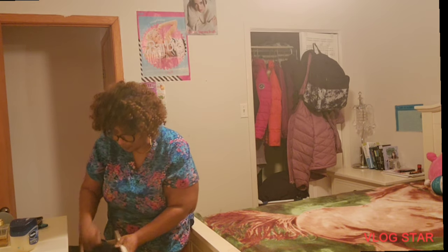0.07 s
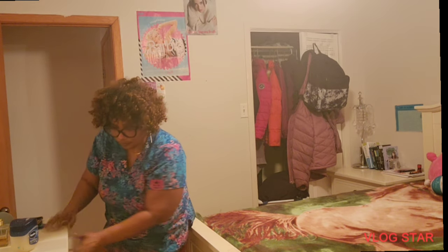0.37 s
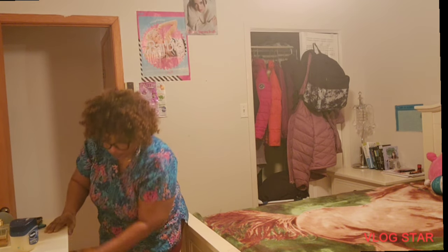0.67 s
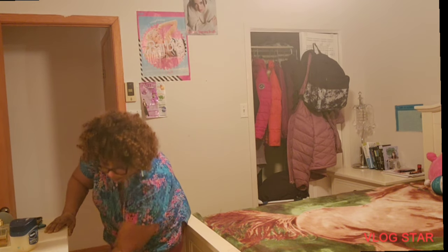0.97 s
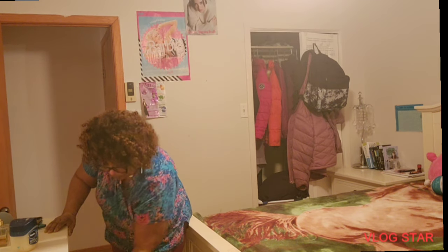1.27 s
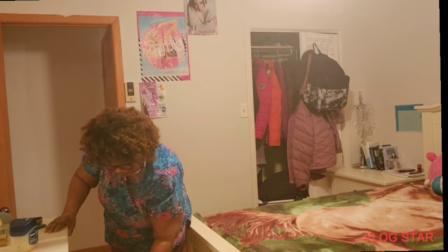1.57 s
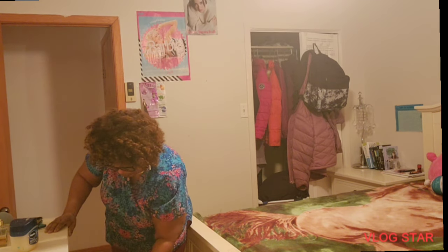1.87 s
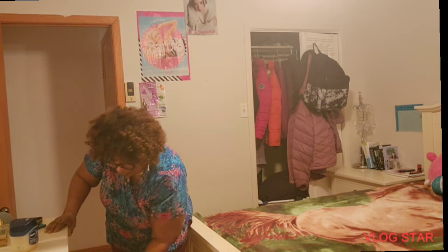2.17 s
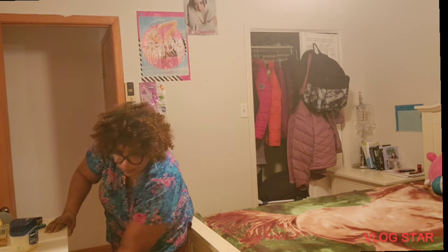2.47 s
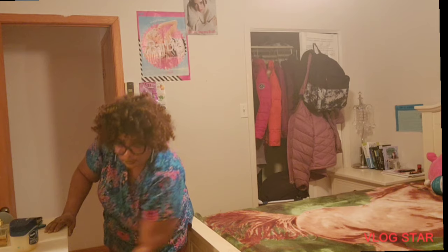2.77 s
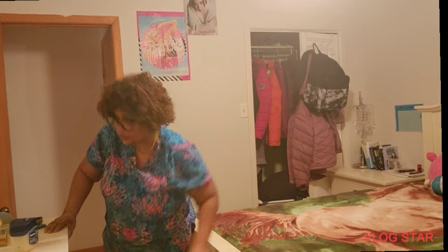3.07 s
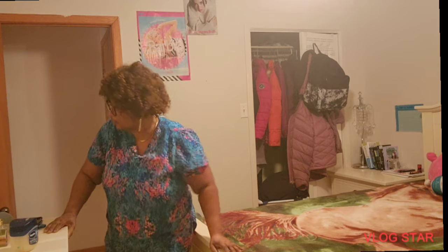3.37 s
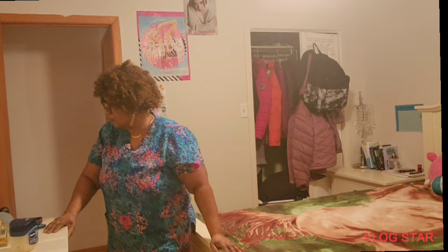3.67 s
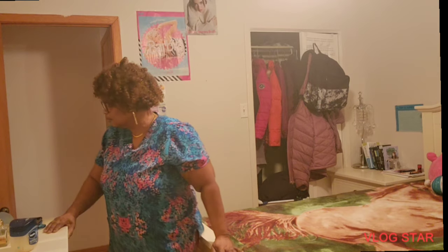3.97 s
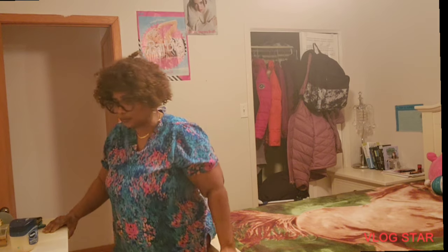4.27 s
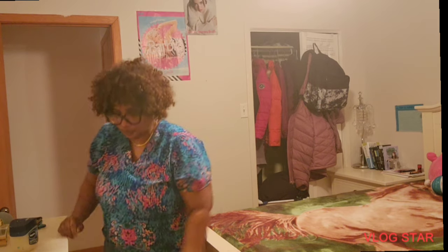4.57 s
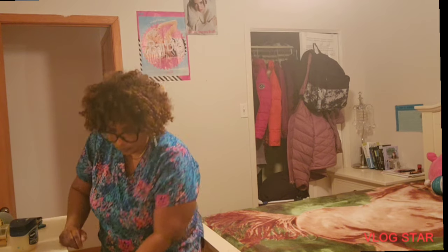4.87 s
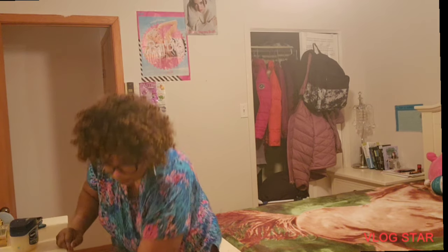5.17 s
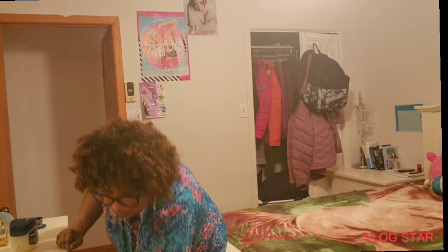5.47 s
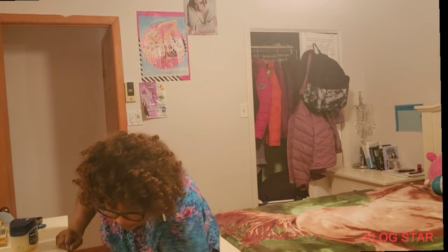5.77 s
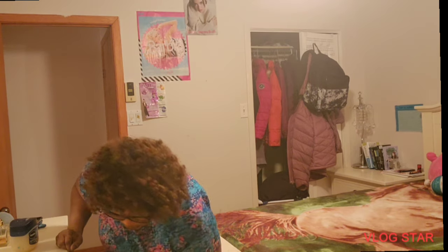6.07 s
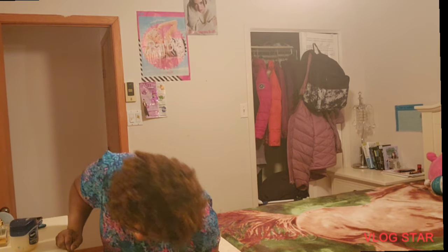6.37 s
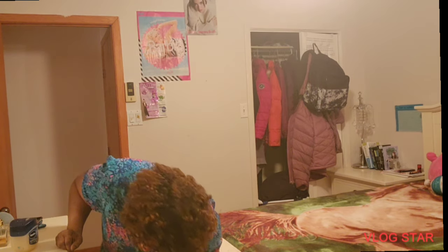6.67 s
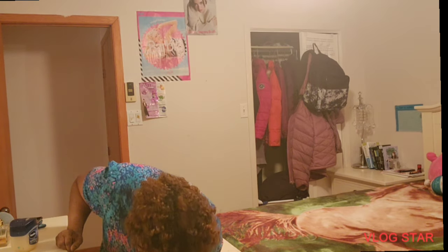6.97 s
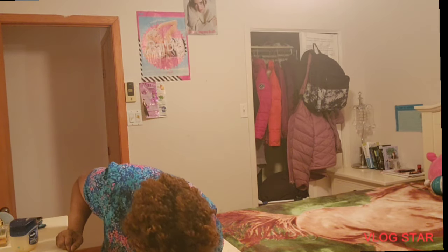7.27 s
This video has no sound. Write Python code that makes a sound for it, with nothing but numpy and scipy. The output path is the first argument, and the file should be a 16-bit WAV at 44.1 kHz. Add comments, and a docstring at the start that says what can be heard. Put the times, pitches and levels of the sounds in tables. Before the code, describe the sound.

In a small bedroom, wooden dresser drawers rumble on their runners and bang against their stops. The first bang is sharp and loudest, slightly overloading a microphone a couple of metres away, and more hollow knocks follow quickly. A quieter stretch brings soft cloth swishes, low shifts of weight on floorboards and a couple of taps on wood. Then another drawer slides and bumps closed with a few duller thuds.

```python
"""Wooden drawers rumble on their runners and bang against their stops as someone searches a dresser.
Stick-slip friction drives each slide; each impact excites free vibration, so that the thin panels clack,
the hollow carcass rings and the whole dresser booms with the floor. In between, cloth slides, a hand
taps the furniture and feet shift on the boards. The small bedroom reverberates briefly, and the
hardest bangs overload a microphone a couple of metres away."""
import sys
import numpy as np
from scipy import signal
from scipy.fft import rfft, irfft
from scipy.io import wavfile
from scipy.ndimage import uniform_filter1d

SR = 44100
rng = np.random.default_rng(int(sys.argv[2]) if len(sys.argv) > 2 else 0)


def wav_out(sig):
    """Save sig, one row per channel (or a flat mono array), as 16-bit PCM at SR to the path in sys.argv[1]."""
    wavfile.write(sys.argv[1], SR, np.round(np.clip(np.atleast_2d(sig).T, -1, 1) * 32767).astype(np.int16))


N = 331632
TIME_S = np.arange(N) / SR
RING_S = np.arange(SR) / SR  # the second that one blow may last
BINS_HZ = np.fft.rfftfreq(4096, 1 / SR)

# drawer slides: start_s, length_s, swell_db, shudder_db, rumble_db, scrape_db
DRAWER_RUNS = [(0, 0.047, -10.5, -57.5, -33, -45.5), (.12, 0.31, 6, -41.5, -41, -56),
               (0.969, 0.23, -1, -42.5, -48, -60), (1.2, .24, 7.5, -47, -43, -52),
               (1.9, .15, 2.5, -52, -56.5, -60.5), (2.17, 0.39, -12, -40.5, -42, -60),
               (4.047, .4, 6.5, -70, -57.5, -67.5), (4.45, .14, 4.5, -49.5, -46, -60.5),
               (5.28, 0.57, 5.5, -38, -51.5, -62.5)]
# friction spectra of frame, box and runner: frequency_hz, density_db
SHUDDER_SPECTRUM = [(18, -25.5), (40, -7.5), (62, 0), (90, -11.5), (140, -30.5), (400, -72)]
RUMBLE_SPECTRUM = [(50, -29), (110, -9), (160, 0), (290, -3.5), (380, -16), (550, -15.5), (900, -32),
                   (3000, -74.5)]
SCRAPE_SPECTRUM = [(200, -19), (600, 4), (1000, 2.5), (1500, 5), (2300, -2.5), (4500, -14.5), (7000, -19),
                   (9000, -35.5), (15500, -43)]
# slides of sleeves or bedding: start_s, length_s, swell_db, level_db
CLOTH_SLIDES = [(0, 0.27, -4.5, -65.5), (0.294, 0.23, 12.5, -57), (1.154, 0.31, -1.5, -62),
                (2.262, 0.28, -10, -62.5), (2.72, 0.18, -11, -66.5), (3.05, 0.26, -5.5, -63.5),
                (3.787, 0.091, -7, -57.5), (3.95, 0.28, 16, -65.5), (4.21, 0.23, 2, -58.5),
                (4.502, 0.31, -13, -61.5), (5.231, 0.11, -5, -57.5), (5.347, 0.26, -1, -53.5)]
# quick brushes over cloth: start_s, level_db, rise_s, fade_s, crisp_db
CLOTH_BRUSHES = [(3.311, -51.5, 0.037, 0.034, -66), (3.581, -50, 0.01, 0.034, -71),
                 (3.821, -57, 0.031, 0.029, -68), (4.444, -45, 0.031, 0.072, -57),
                 (4.682, -55, 0.021, 0.033, -62.5), (6.347, -48, 0.00504, 0.11, -78.5)]
# constant slight stirring of clothes: time_s, level_db
CLOTH_STIR = [(0, -59), (1.8, -75.5), (3.5, -64), (5.1, -66), (6, -68.5), (6.9, -70), (7.52, -76)]
# spectra of sliding, brushed and snagging fibres: frequency_hz, density_db
SLIDE_SPECTRUM = [(590, -48), (1000, -7), (1330, -3), (1440, 0), (1560, -0.5), (2310, -1.5), (4190, -2),
                  (8740, -18), (11200, -19), (15500, -19.5)]
BRUSH_SPECTRUM = [(400, -30), (900, -12.5), (1450, 0), (2100, -2), (2900, -0.5), (3700, -1.5), (5200, -3.5),
                  (6600, -13), (8400, -24), (15000, -45.5)]
SNAG_SPECTRUM = [(3000, -36), (5500, 7), (9000, 0.5), (11500, 4.5), (15500, 0)]
# resonances of the brushed surface and of the drawer panels: centre_hz, width_hz, gain_db
BRUSH_RESONANCES = [(2160, 101, -2.5), (2950, 300, 1), (5550, 200, 3)]
PANEL_RESONANCES = [(500, 26, 1.5), (783, 45, 3.7), (1010, 10, 5.8), (1106, 69, 3.4), (1490, 28, 3.2),
                    (1625, 21, 3.8), (1985, 28, 3), (2340, 17, 5.8), (3261, 60, 3.1), (4130, 70, 4),
                    (4650, 45, 5), (5400, 25, 2.2)]
# spectrum of the still room: frequency_hz, density_db
HUSH_SPECTRUM = [(12, -58.5), (20, -33), (32, -19.5), (44, -10), (64, -4.5), (83, -17), (109, -14),
                 (129, -16.5), (333, -27), (597, -34), (788, -37.5), (4550, -56), (4950, -53.5),
                 (8640, -76.5), (15500, -73)]
# drawer impacts (a harder stop has a higher corner): start_s, boom_db, carcass_db, corner_hz,
# clack_db, tilt_db_per_octave, centre_hz, edge_db, rattle_s
DRAWER_BLOWS = [(0.001, -49.5, -30, 330, -42.5, -2, 1070, -15, 0.002),
                (0.044, -49.5, -28.5, 141.4, -62, -20, 800, -5, 0.01),
                (0.183, -55, -32.5, 165, -45.5, -6, 1170, -4, 0.0063),
                (0.344, -41, -28.5, 118.9, -60.5, -5, 1190, -10, 0.009),
                (0.429, -22, -23, 120, -36.5, 2, 1600, -16, .004),
                (0.460, -8, -11.5, 304.2, -20, -1, 5000, -2.5, 0.0017),
                (0.470, -33.5, -4, 135, -12, -6, 1200, -7, .002),
                (0.931, -40, -33, 150.2, -54, 3.5, 1740, -6, 0.0057),
                (1.036, -37, -40.5, 224, -52, -12.5, 1400, -4, 0.0065),
                (1.445, -25, -12.5, 290, -30, -3, 1390, 1.5, .014),
                (1.459, -22.5, -6, 237, -24.5, -4.5, 1040, 5.5, 0.0031),
                (1.828, -57.5, -40, 302, -45, -5, 687, -18, 0.0099),
                (2.057, -28.5, -34, 299.5, -31, 0.6, 2200, -12.5, .012),
                (2.087, -23, -12.5, 220.8, -35.5, -4.5, 1520, -3, 0.0064),
                (2.525, -9, -16.5, 158.1, -29, -2, 4300, -2.5, 0.011),
                (2.546, -13, -12.5, 202, -28, -5.5, 520, -6.5, .0033),
                (2.946, -61, -42, 282, -55, -6, 692, -4.5, 0.013),
                (2.997, -58, -41.5, 253, -58, -0.5, 600, -10, 0.0094),
                (3.423, -63, -48, 208, -48.5, -5, 740, -8, .003),
                (4.812, -53.5, -44, 280, -45, 0, 3330, 4, .012),
                (5.563, -27, -41, 119, -51, -5, 1520, -11, .015),
                (5.624, -19, -19, 192.3, -31.5, 1, 1810, -23, 0.013),
                (5.716, -23.5, -24.5, 168.4, -35.5, -0.5, 1890, -23, 0.007),
                (6.074, -25, -32.5, 150.6, -50, -2.5, 1264, -5, 0.0077),
                (6.76, -52.5, -41.5, 202, -46.5, -4.5, 550, -10, .004)]
# modes of dresser with floor and air, of the carcass, and of tapped wood, before each strike
# scales them: pitch_hz, level_db, t60_s
BOOM_MODES = [(42.03, -11.5, 0.77), (53.56, -5, .5), (62.8, 2, 0.95), (68.65, -1.5, 0.34), (79.6, 4, 0.56),
              (99.3, -7, 0.35)]
CARCASS_MODES = [(118.4, -10.5, 0.5), (134.26, -1, 0.25), (156.2, 2, 0.27), (184.2, -2.5, 0.29),
                 (225.4, -1, 0.25), (260.2, -2, 0.28), (296.2, 2, 0.25), (339.6, -4, 0.16),
                 (378.7, -10, .36), (413, -12.5, 0.42), (455, -11, 0.3), (519, -3.5, 0.3), (667, -6, 0.37),
                 (730, -8.5, .34)]
WOOD_MODES = [(437, -8, 0.03), (598, -6, 0.044), (891, -12, 0.018), (1123, -4.5, 0.018), (1372, -1.5, 0.04),
              (1630, -0.5, 0.025), (1850, -13.5, 0.016), (2320, -24, .015), (3320, -16, 0.09)]
# spectra of the panels' overlapping modes and of a hard contact: frequency_hz, density_db
PANEL_SPECTRUM = [(60, -23), (280, -8.5), (450, 0), (650, -4.5), (900, -7.5), (1450, -4.5), (2000, -9),
                  (3000, -11), (5000, -18.5), (6500, -26), (9000, -28.5), (15500, -34.5)]
CLICK_SPECTRUM = [(200, 4), (1000, 14), (3500, 7), (6000, -1.5), (9000, -8.5), (12000, -9), (15500, -9.5)]
# sharp taps on the furniture: start_s, wood_db, pitch_ratio, click_db
FURNITURE_TAPS = [(0.103, -68, 0.83, -56.5), (0.472, -21.5, 1, -34), (3.760, -50.5, 1.08, -51.5),
                  (4.822, -37, 0.96, -40.5), (5.25, -65, 1.4, -58.5), (5.386, -65, 2.2, -68)]
# shifts of weight on the floorboards: peak_s, level_db
FOOT_SHIFTS = [(.33, -30.5), (3.389, -43), (4.63, -40.5), (4.95, -41.5), (5.37, -38)]
# reverberation time of the bedroom: frequency_hz, t60_s
ROOM_DECAY = [(100, .42), (300, .4), (700, .38), (1500, .36), (3000, .34), (5000, .35), (9000, .31),
              (15000, .26)]
# likeness of the diffuse field at the two microphone ports: frequency_hz, coherence_ratio
PORT_COHERENCE = [(30, 1), (150, .98), (300, .9), (450, 0.89), (700, 0.22), (1500, 0.052), (3000, -.15),
                  (15000, 0.29)]
# left port's level above the right: frequency_hz, difference_db
PORT_BALANCE = [(350, 0.3), (700, 3.5), (1400, -4), (2800, -0.1), (6000, -1.1), (14000, 2)]
# left port's phase behind the right: frequency_hz, lag_rad
PORT_PHASE = [(35, 0.23), (60, 0.27), (125, 0.0044), (400, .05), (800, 0.011)]


def gain_of(db):
    """Amplitude grows tenfold every 20 dB."""
    return 10 ** (np.asarray(db) / 20)


def unit_rms(x):
    """Normalisation to unit mean power."""
    return x / np.sqrt(np.mean(x ** 2) + 1e-20)


def impact_energy(x):
    """Normalisation of a transient to the energy of 40 ms at rms 1."""
    return unit_rms(x) * np.sqrt(.04 * SR / x.shape[-1])


def curve_at(points, hz):
    """Interpolation on a logarithmic frequency axis."""
    knots_hz, values = np.transpose(points)
    return np.interp(np.log(hz + 1), np.log(knots_hz + 1), values)


def add(mix, start_s, sound):
    """Superposition: a stereo sound adds to the mix from start_s on."""
    part = mix[:, max(round(start_s * SR), 0):][:, :sound.shape[1]]
    part += sound[:, :part.shape[1]]


def colour(x, db):
    """Causal filtering by a gain on BINS_HZ: nothing sounds before the attack."""
    log_gain = np.log(gain_of(np.r_[db, db[-2:0:-1]]))
    impulse = np.fft.ifft(np.exp(np.conj(signal.hilbert(log_gain)))).real
    return signal.fftconvolve(x, impulse[None], axes=1)[:, :x.shape[1]]


def resonances(peaks):
    """Each resonance raises a bell-shaped peak, in dB on BINS_HZ."""
    return sum(db / (1 + (2 * (BINS_HZ - hz) / width_hz) ** 2) for hz, width_hz, db in peaks)


def ripple():
    """A response depends on the point of contact: random peaks and dips some 200 Hz apart."""
    bumps = uniform_filter1d(rng.standard_normal(len(BINS_HZ)), size=9)
    bumps = uniform_filter1d(bumps, size=5)
    return unit_rms(bumps - uniform_filter1d(bumps, size=35))


def diffuse(size):
    """A diffuse field is coherent at two nearby points in the bass, hardly so in the treble."""
    mid, side = rfft(rng.standard_normal((2, size)))
    coherence = np.clip(curve_at(PORT_COHERENCE, np.fft.rfftfreq(size, 1 / SR)), -1, 1)
    mid, side = mid * np.sqrt((1 + coherence) / 2), side * np.sqrt((1 - coherence) / 2)
    return irfft(np.array([mid + side, mid - side]), size)


def noise(spectrum, grain_db=0, grain_hz=100):
    """Coloured diffuse noise; random amplitude modulation gives it the grain of friction."""
    knots = rng.standard_normal(8000)
    grip = np.interp(TIME_S * grain_hz, np.arange(len(knots)), knots)
    return unit_rms(colour(diffuse(N) * gain_of(grain_db * grip), curve_at(spectrum, BINS_HZ)))


def room_tail(build_s):
    """Reverberation: reflections build up, then each band decays exponentially."""
    hz, t, bands = signal.stft(diffuse(SR), SR, nperseg=256)
    t60 = curve_at(ROOM_DECAY, hz)[:, None]
    decaying = bands * gain_of(-60 * t / t60) / np.sqrt(t60)
    tail = signal.istft(decaying, SR, nperseg=256)[1][:, :SR]
    tail *= 1 - np.exp(-RING_S / build_s)
    return tail / np.linalg.norm(tail[0])


def in_bedroom(x, wet_db):
    """Direct sound and reverberant field add at the listener."""
    reverberant = signal.fftconvolve(x[None], room_tail(build_s=0.0043), axes=1)[:, :len(x)]
    return x + gain_of(wet_db) * reverberant


def stroke(start_s, length_s, swell_db, attack_s, release_s):
    """Friction noise follows sliding speed: it eases in, changes by swell_db and dies away."""
    t = TIME_S - start_s
    ease = np.sin(np.pi / 2 * np.clip(t / attack_s, 0, 1)) ** 2
    swell = gain_of(swell_db * (np.clip(t / length_s, 0, 1) - .5))
    return ease * swell * np.exp(-np.maximum(t - length_s, 0) / release_s)


def trembling(level_db=-14.5, rise_s=.1, t60_s=1.2):
    """Envelope of the shaking that blows leave in dresser and floor: incoherent powers add."""
    shake = (1 - np.exp(-RING_S / rise_s)) * gain_of(level_db - 60 * RING_S / t60_s)
    power = np.zeros((2, N))
    for start_s, _, carcass_db, *_ in DRAWER_BLOWS:
        add(power, start_s, (gain_of(carcass_db) * shake[None]) ** 2)
    return np.sqrt(power)


def runners(settle_db=-25.5):
    """Stick-slip friction of wood on wood: the frame shudders, the box rumbles, the runners scrape."""
    shudder, rumble, scrape = sum(
        gain_of(levels_db)[:, None] * stroke(start_s, length_s, swell_db, attack_s=.018, release_s=.023)
        for start_s, length_s, swell_db, *levels_db in DRAWER_RUNS)
    shake = trembling()
    shudder = np.hypot(shudder, shake)
    scrape = np.hypot(scrape, gain_of(settle_db) * shake)  # the contents jiggle after a blow
    rasp = noise(SCRAPE_SPECTRUM, grain_db=-3.5, grain_hz=100.4)
    rasp = unit_rms(colour(rasp, 0.25 * resonances(PANEL_RESONANCES)))
    frame = shudder * noise(SHUDDER_SPECTRUM)
    box = rumble * noise(RUMBLE_SPECTRUM, grain_db=2, grain_hz=59.8)
    return frame + box + scrape * rasp


def cloth(ripple_db=1.54):
    """Fibres catch and release, radiating friction noise that nearby surfaces colour."""
    swish, crisp = np.zeros(N), np.zeros(N)
    for start_s, db, rise_s, fade_s, crisp_db in CLOTH_BRUSHES:
        t = TIME_S - start_s
        flick = np.clip(t / rise_s, 0, 1) * np.exp(-np.maximum(t - rise_s, 0) / fade_s)
        swish += gain_of(db) * flick
        crisp += gain_of(crisp_db) * flick
    sliding = sum(gain_of(db) * stroke(start_s, length_s, swell_db, attack_s=0.054, release_s=0.025)
                  for start_s, length_s, swell_db, db in CLOTH_SLIDES)
    stir = gain_of(np.interp(TIME_S, *np.transpose(CLOTH_STIR)))
    slides = np.hypot(sliding, stir) * noise(SLIDE_SPECTRUM, grain_db=1.05, grain_hz=249)
    hiss = noise(BRUSH_SPECTRUM, grain_db=-1.3, grain_hz=308)
    brushes = swish * unit_rms(colour(hiss, resonances(BRUSH_RESONANCES)))
    snags = crisp * noise(SNAG_SPECTRUM, grain_db=1, grain_hz=400.5)
    return colour(slides + brushes + snags, ripple_db * ripple())


def room_hush(level_db=-51):
    """The ambient noise of a still room is a steady diffuse field, strongest in the bass."""
    return gain_of(level_db) * noise(HUSH_SPECTRUM)


def ring(modes, rise_s, pitch_ratio=1, corner_hz=20000, t60_ratio=1, scatter=0, damping=1.0):
    """Free vibration is a sum of damped modes; a springy contact weakens those above its corner."""
    hz, db, t60 = np.transpose(modes)[:, :, None]
    # neighbours start in opposite sense, scattered because each strike lands on another spot
    half_turns = np.arange(len(modes))[:, None] + scatter * rng.uniform(-2.1, 1, hz.shape)
    push = 1 / np.hypot(1 - (hz / corner_hz) ** 2, damping * hz / corner_hz)
    envelopes = push * gain_of(db - 60 * RING_S / (t60 * t60_ratio))
    partials = envelopes * np.sin(2 * np.pi * hz * pitch_ratio * RING_S + np.pi * half_turns)
    return partials.sum(0) * (1 - np.exp(-RING_S / rise_s))


def chatter(rattle_s, wet_db):
    """Rapid small contacts make a broadband burst; reverberation builds for as long as they last."""
    slaps = rng.standard_normal(SR)
    envelope = np.exp(-RING_S / rattle_s) * (1 - np.exp(-RING_S / (.8 * rattle_s)))
    contacts = slaps * abs(slaps) * envelope
    return contacts / np.linalg.norm(contacts) + gain_of(wet_db) * room_tail(build_s=rattle_s)


def panel_colour(tilt_db_per_octave, centre_hz, edge_db, centre_db=6, edge_hz=7000, ripple_db=2.5):
    """Overlapping panel modes merge into a response in dB; a sharp edge strengthens the top octave."""
    shared = curve_at(PANEL_SPECTRUM, BINS_HZ) + resonances(PANEL_RESONANCES)
    tilt = tilt_db_per_octave * np.log2(np.maximum(BINS_HZ, 400) / 1500)
    hump = centre_db * np.exp(-(np.log2((BINS_HZ + 1) / centre_hz) / 0.4) ** 2)
    shelf = edge_db * (1 - 1 / (1 + (BINS_HZ / edge_hz) ** 8))
    return shared + tilt + hump + shelf + ripple_db * ripple()


def drawer_blows(full_t60_ratio=0.66, doubling_db=70):
    """Impact on a stop excites dresser, carcass and panels at once; heavier blows ring longer."""
    out = np.zeros((2, N))
    for start_s, boom_db, carcass_db, corner_hz, clack_db, *panel, rattle_s in DRAWER_BLOWS:
        t60_ratio = full_t60_ratio * 2 ** (max(boom_db, carcass_db) / doubling_db)
        boom = gain_of(boom_db) * impact_energy(ring(BOOM_MODES, rise_s=.006, t60_ratio=t60_ratio))
        hollow = ring(CARCASS_MODES, rise_s=0.023, corner_hz=corner_hz, t60_ratio=t60_ratio,
                      scatter=0.47, damping=.8)
        carcass = gain_of(carcass_db) * impact_energy(in_bedroom(hollow, wet_db=-3.0))
        contacts = chatter(rattle_s, wet_db=6.5)
        clack = gain_of(clack_db) * impact_energy(colour(contacts, panel_colour(*panel)))
        add(out, start_s, boom + carcass + clack)
    return out


def taps():
    """A brief, hard contact has a wide spectrum: it clicks and rings the wood's higher modes."""
    out = np.zeros((2, N))
    for start_s, wood_db, pitch_ratio, click_db in FURNITURE_TAPS:
        modes = ring(WOOD_MODES, rise_s=0.000067, pitch_ratio=pitch_ratio, scatter=0.5)
        wood = impact_energy(in_bedroom(modes, wet_db=-4.5))
        contacts = chatter(rattle_s=.0012, wet_db=12.0)
        click = impact_energy(colour(contacts, curve_at(CLICK_SPECTRUM, BINS_HZ)))
        add(out, start_s, gain_of(wood_db) * wood + gain_of(click_db) * click)
    return out


def foot_shifts(load_s=.045):
    """A foot loads the compliant floor slowly, so only low frequencies are excited."""
    load = sum(gain_of(db) * np.exp(-((TIME_S - peak_s) / load_s) ** 2) for peak_s, db in FOOT_SHIFTS)
    return load * noise(SHUDDER_SPECTRUM)


def scene():
    """Dresser, hands, feet and cloth superpose linearly on the hush of the room."""
    return drawer_blows() + taps() + runners() + foot_shifts() + cloth() + room_hush()


def record(dry, echo_s=.00095, echo_gain=0.071, cutoff_hz=15900):
    """A housing echo interferes at two unequal ports; peaks saturate and the band is limited."""
    hz = np.fft.rfftfreq(N, 1 / SR)
    shadowing = np.minimum(hz / PORT_BALANCE[0][0], 1)  # long waves reach both ports alike
    lean_db = curve_at(PORT_BALANCE, hz) * shadowing / 2
    left = gain_of(lean_db) * np.exp(-.5j * curve_at(PORT_PHASE, hz))
    housing = 1 + echo_gain * np.exp(-2j * np.pi * hz * echo_s)
    ports = irfft(rfft(dry) * housing * np.array([left, 1 / left]), N)
    clipped = ports / (1 + ports ** 8) ** (1 / 8)
    lowpass = signal.firwin(511, cutoff_hz, window=("kaiser", 9), fs=SR)
    return signal.oaconvolve(clipped, lowpass[None], "same")


dry = scene()
out = record(dry)
wav_out(out)
```